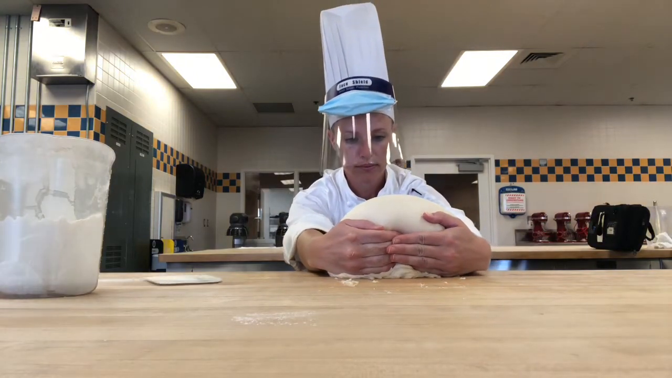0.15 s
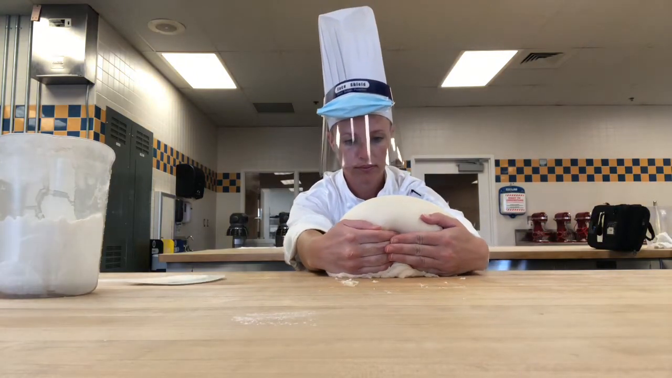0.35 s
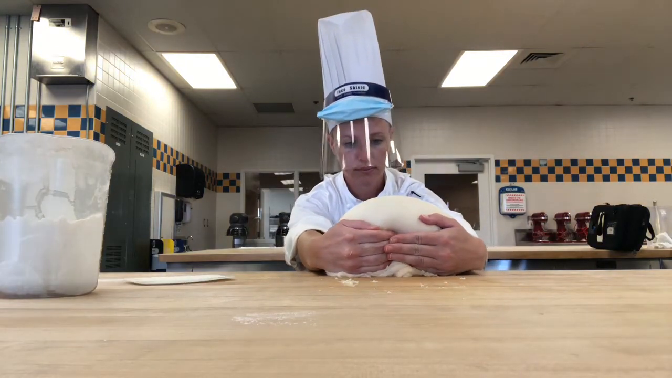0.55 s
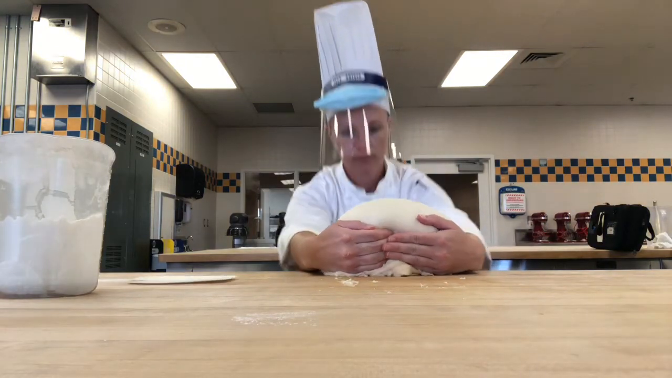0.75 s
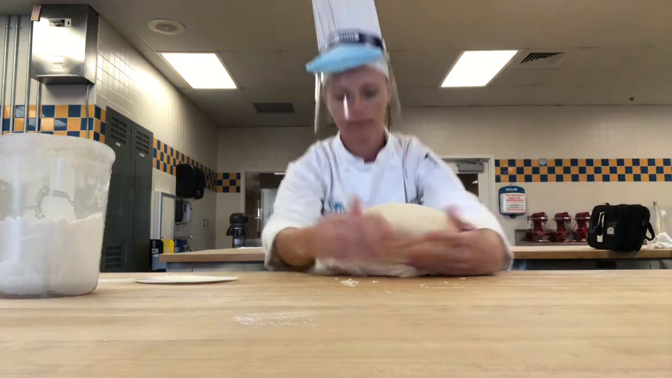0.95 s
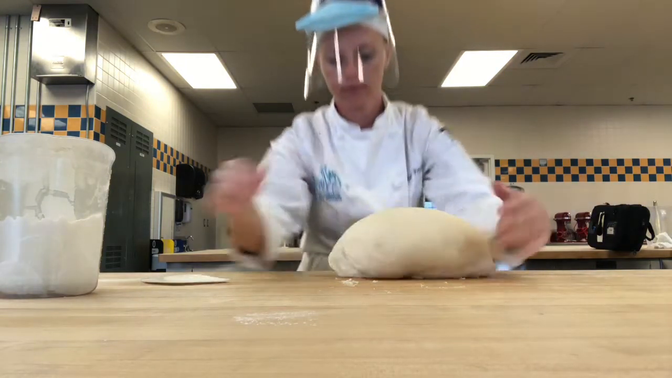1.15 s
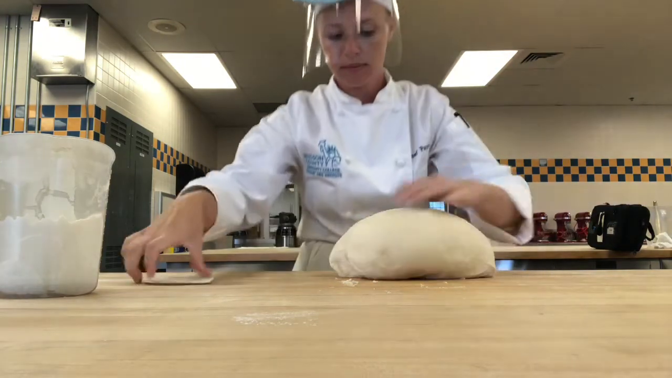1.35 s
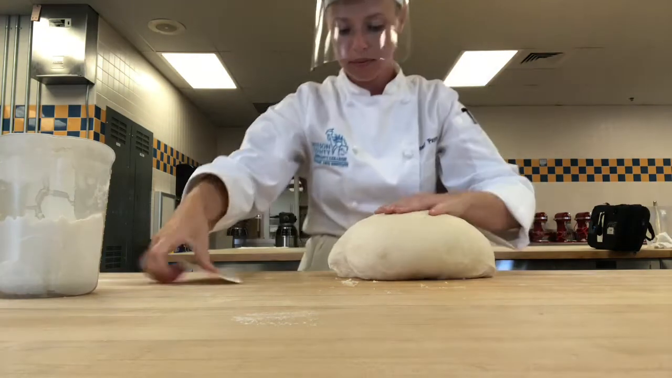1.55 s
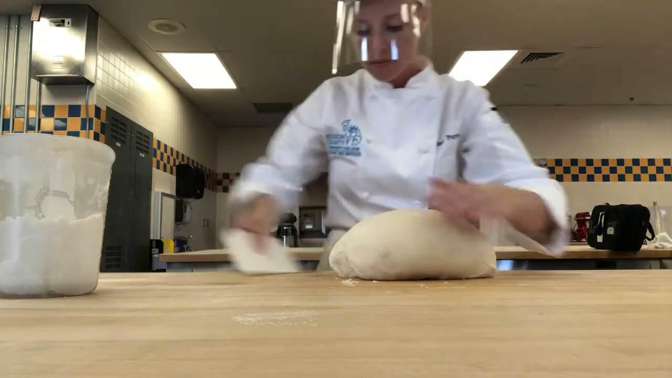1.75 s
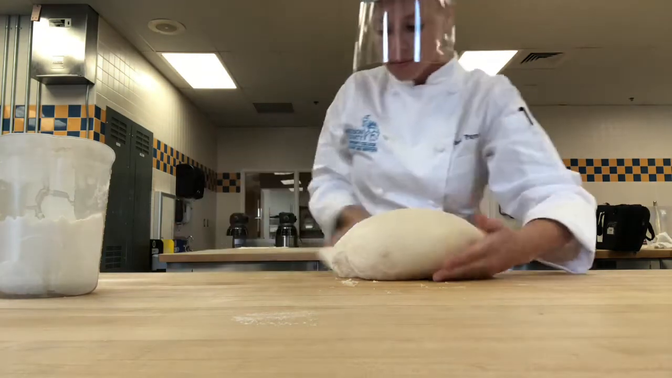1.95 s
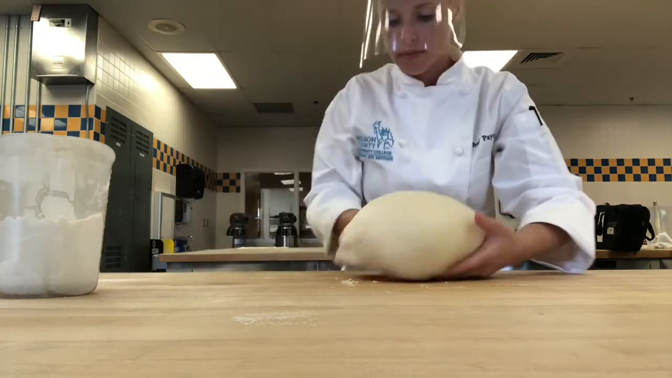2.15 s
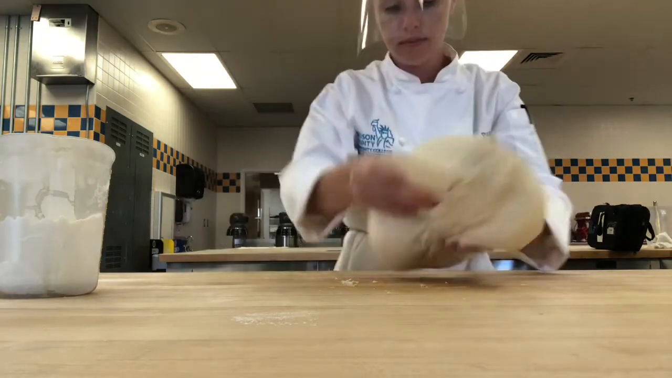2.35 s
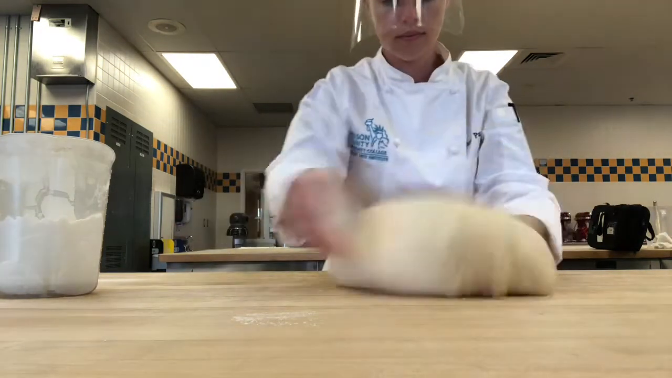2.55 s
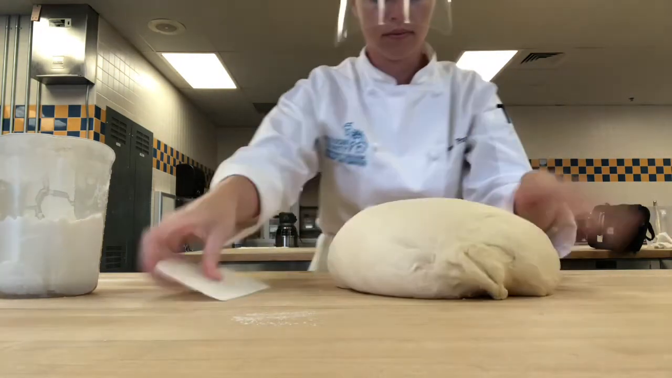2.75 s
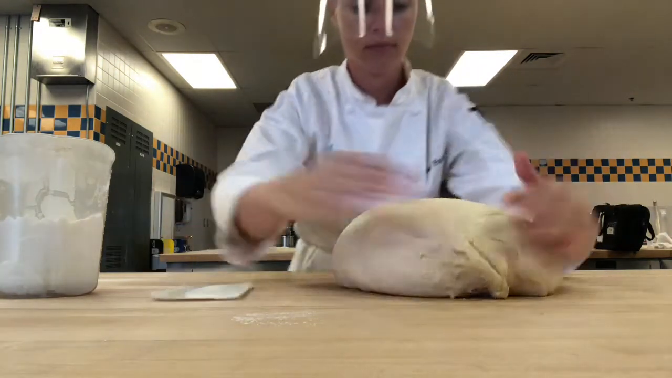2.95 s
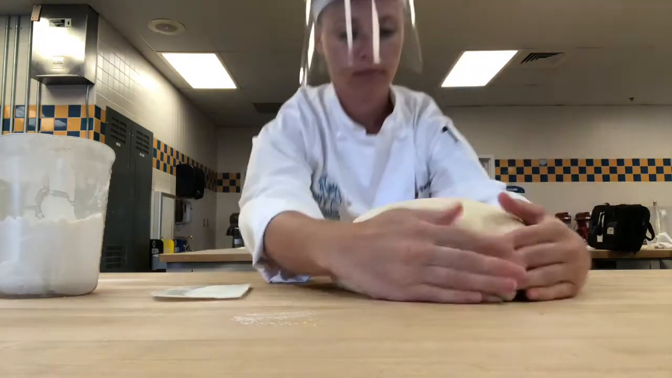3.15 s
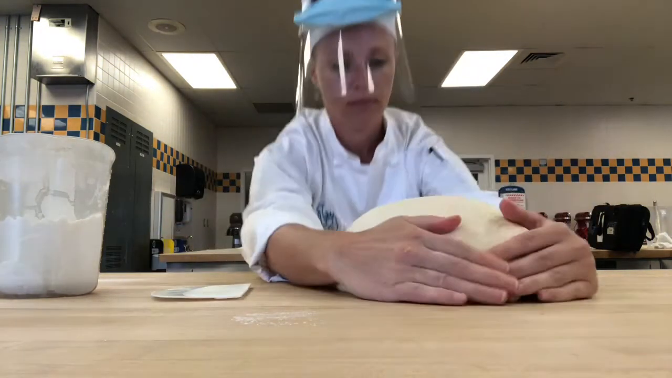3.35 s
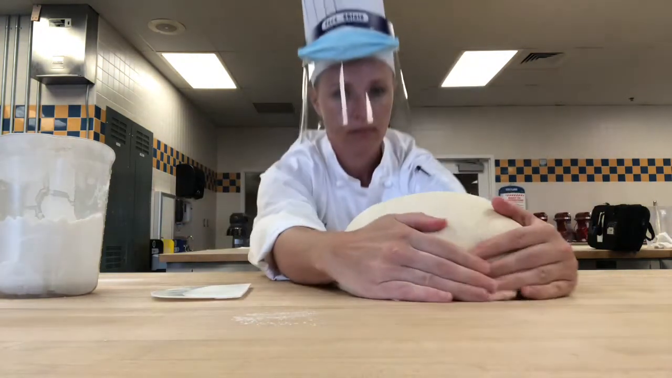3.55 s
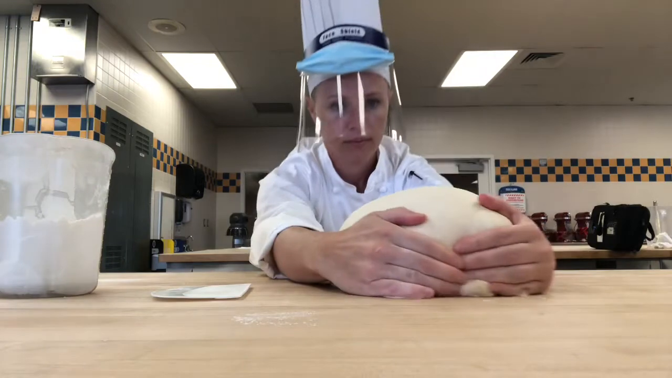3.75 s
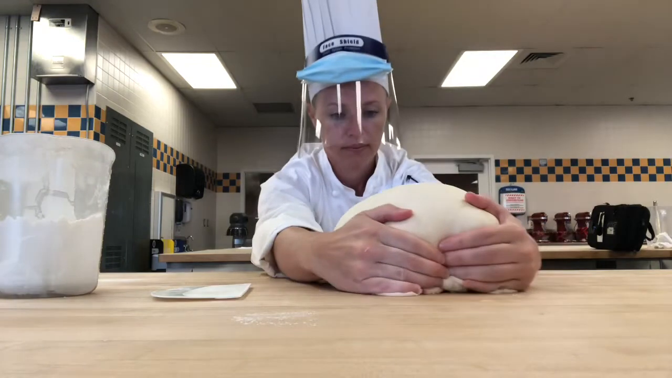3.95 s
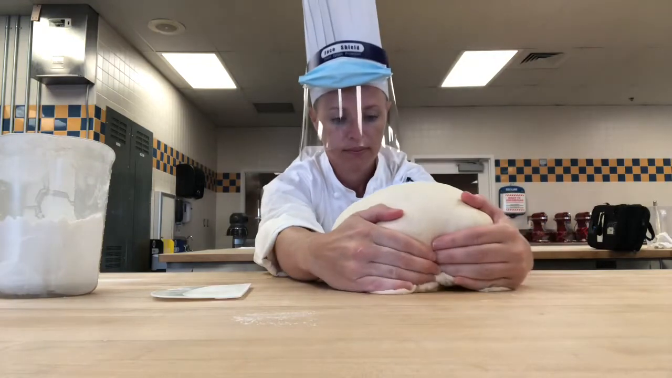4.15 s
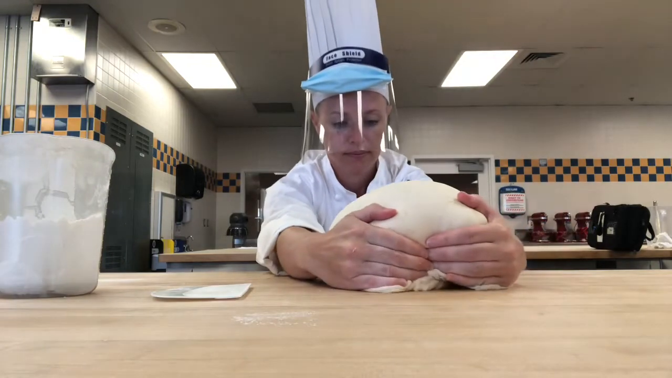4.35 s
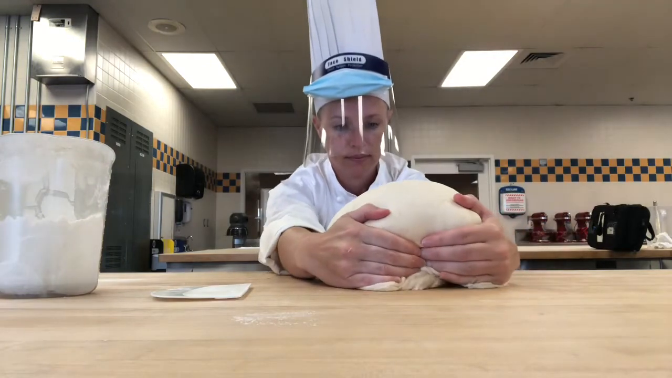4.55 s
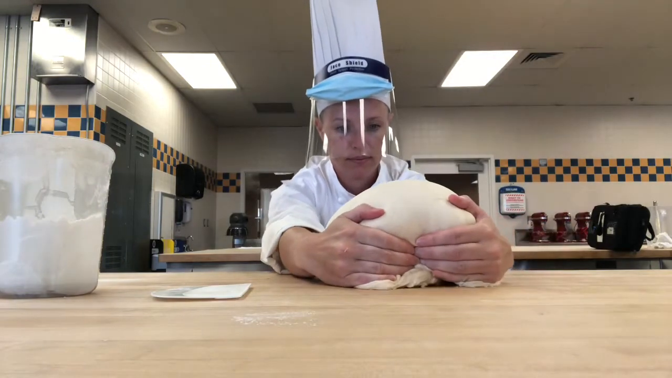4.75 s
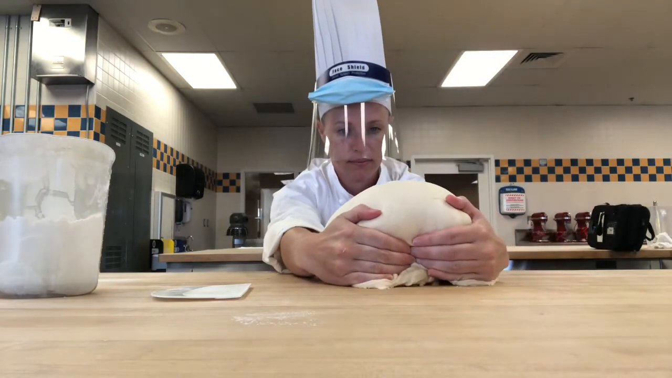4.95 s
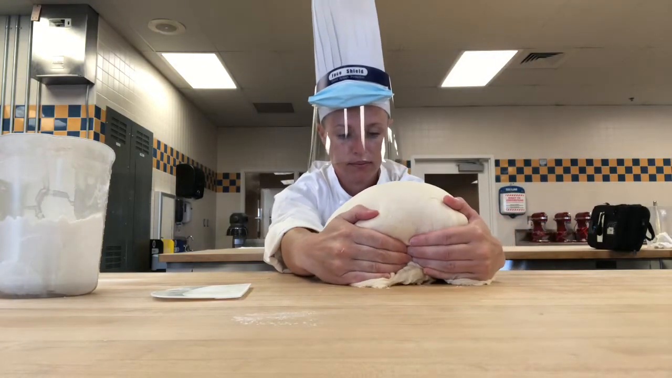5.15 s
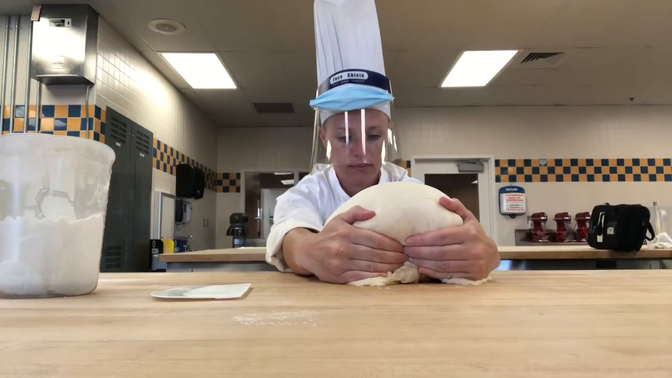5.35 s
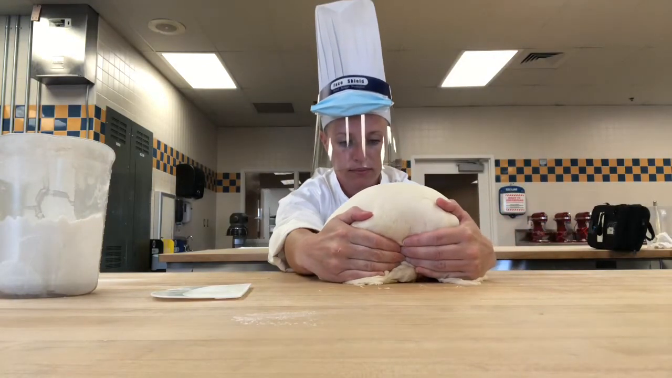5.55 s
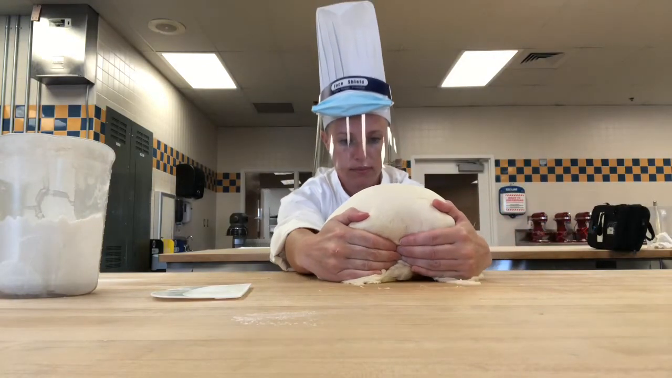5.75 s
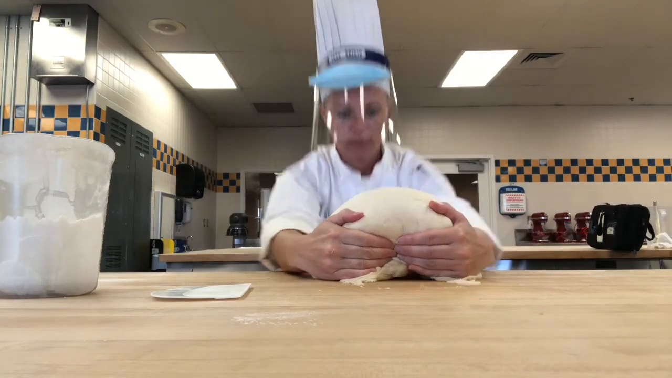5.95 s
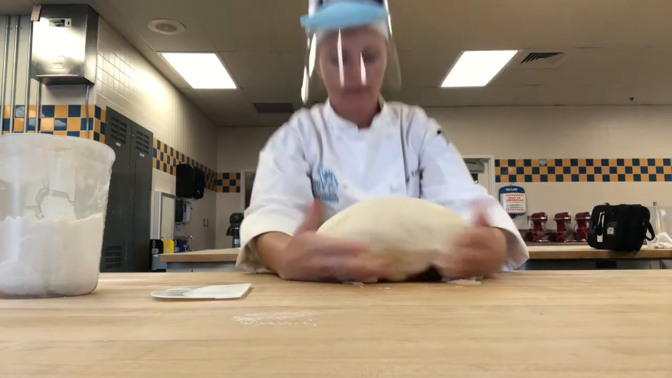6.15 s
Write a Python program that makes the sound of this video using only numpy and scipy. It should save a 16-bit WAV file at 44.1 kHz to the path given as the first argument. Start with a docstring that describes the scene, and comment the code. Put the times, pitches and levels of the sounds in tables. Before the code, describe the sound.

In a humming kitchen, a scraper clacks and rasps under dough, a hard knock follows, and palms brush the dough quietly afterwards.

```python
"""A ball of bread dough is cupped, turned and dragged over a floured bench: coloured flour-grain clicks.
A plastic scraper scrapes under it (stick-slip noise) and knocks on the wood (noise cracks, ringing modes).
Ticks, bumps and brushes are shaped noise; a rising tone squeaks. The bench is close to the microphone.
Around it a large kitchen returns a diffuse echo, over duct noise and motor tones that hum and beat."""
import sys
import numpy as np
from scipy import signal
from scipy.fft import rfft, irfft
from scipy.io import wavfile
from scipy.ndimage import map_coordinates

SR = 44100
rng = np.random.default_rng(int(sys.argv[2]) if len(sys.argv) > 2 else 0)


def transcribe(u):
    """Save the signal u as a 16-bit wav file named by the first command-line argument.

    u: samples, shape (n,) or (channels, n), limited to [-1, 1]; the rate is SR.
    q: integer samples, one column per channel.
    """
    v = np.clip(np.atleast_2d(u).T, -1, 1)
    q = np.round(v * 32767).astype(np.int16)
    wavfile.write(sys.argv[1], SR, q)


N = 272538
TIME = np.arange(N) / SR  # seconds


def from_db(db):
    """Decibels to amplitude gain."""
    return 10 ** (np.asarray(db) / 20)


def rms_one(x):
    """Scale to unit rms."""
    return x / np.sqrt(np.mean(x ** 2) + 1e-20)


def band(x, low_hz, high_hz, order=2):
    """Causal Butterworth band-pass."""
    sos = signal.butter(order, [low_hz, min(high_hz, .45 * SR)], "band", fs=SR, output="sos")
    return signal.sosfilt(sos, x + 1e-18)


def colour(x, points):
    """Minimum-phase filter through (hz, level_db) points, with unit power gain for white noise."""
    hz, level_db = np.transpose(points)
    grid_hz = np.arange(4097) * SR / 8192
    curve_db = np.interp(np.log(grid_hz + 1), np.log(hz), level_db)
    # folding the cepstrum onto positive time makes the filter causal
    cepstrum = irfft(np.log(from_db(curve_db)))
    cepstrum[1:4096] *= 2
    cepstrum[4097:] = 0
    response = irfft(np.exp(rfft(cepstrum)))
    return signal.fftconvolve(x, response / np.linalg.norm(response))[:N]


def drift(rate):
    """Smooth random wander of rms 1 through `rate` random knots per second."""
    knots = rng.standard_normal(4000)
    return rms_one(map_coordinates(knots, [TIME * rate], order=3, mode="wrap"))


def grains(per_s, spread_db):
    """Tiny slips of flour grains: random clicks of uneven size, rms 1."""
    sizes = from_db(spread_db * np.minimum(rng.exponential(1, N), 4))
    present = rng.random(N) < per_s / SR
    return rms_one(sizes * rng.standard_normal(N) * present)


def arch(start_s, length_s, skew):
    """Speed of one movement: from rest up to 1 and back; a skew under 1 peaks early."""
    progress = np.clip((TIME - start_s) / length_s, 0, 1)
    return np.abs(np.sin(np.pi * progress ** skew))


def fading(s, level_db, t60, rise_s):
    """Envelope that swells as the contact closes and then dies away by 60 dB in t60 seconds."""
    age = np.maximum(TIME - s, 0)
    return np.minimum(age / rise_s, 1) * from_db(level_db - 60 * np.minimum(age / t60, 3))


def motor_tone(hz, level_db, phase):
    """A steady motor or mains tone whose phase wanders a little; level_db is its rms."""
    in_step_s, wander_rad = .62, .15  # equal phases meet near this time
    angle = 2 * np.pi * hz * (TIME - in_step_s) + phase + wander_rad * drift(3.03)
    return np.sqrt(2) * from_db(level_db) * np.cos(angle)


def ventilation():
    """Air noise in the ducts and their resonances, under motor tones that beat against each other."""
    # steady motor and mains tones: hz, level_db
    hum = [(28.7, -63.5), (56.48, -59), (57.91, -54), (112.92, -59), (114.9, -46.5), (115.78, -54),
           (120.03, -51), (125.83, -53), (126.68, -53), (135.9, -62), (172.35, -56.5), (197.6, -61.5),
           (240.02, -60.5), (289.5, -62), (315.97, -57), (373.42, -62), (459.6, -59.5), (517.05, -62),
           (545.77, -60.5)]
    # two fans at almost the same speed: hz, level_db
    fan_pair = [(229.8, -47), (231.57, -52.5)]
    # spectral shape of air in the ducts: hz, relative level_db_per_hz
    duct = [(39, -25), (54, -2), (78, -6), (125, 8), (170, 1), (340, 3), (520, 0.5), (620, -2.5),
            (1050, -4), (1450, -5.5), (1850, -15), (3100, -26), (7700, -33), (8300, -37.5), (15000, -47)]
    # resonances of the ducts and grilles: hz, width_hz, level_db
    grilles = [(58.8, 17, -60), (476.3, 75, -50.5), (2260, 560, -66.5), (4220, 560, -78.5)]
    duct_db = -44
    sound = from_db(duct_db) * colour(rng.standard_normal(N), duct)
    for hz, width_hz, level_db in grilles:
        noise = rng.standard_normal(N + SR)
        # one second of run-in lets the resonance settle
        settled = band(noise, hz - width_hz / 2, hz + width_hz / 2)[SR:]
        sound += from_db(level_db) * rms_one(settled)
    for hz, level_db in hum:
        sound += motor_tone(hz, level_db, rng.uniform(0, 2 * np.pi))
    for hz, level_db in fan_pair:
        sound += motor_tone(hz, level_db, 0)
    return sound


def kitchen(x, delay_s=0.0089, t60=1, treble_t60=0.37, mid_db=-3.0, treble_db=4.0):
    """Diffuse echo of the tiled room: decaying noise in three overlapping bands, the treble dying first."""
    age = TIME[:SR]
    low = band(rng.standard_normal(SR), 280, 2600) * from_db(-60 * age / t60)
    mid = band(rng.standard_normal(SR), 1350, 3600) * from_db(mid_db - 60 * age / t60)
    high = band(rng.standard_normal(SR), 1800, 7500, order=1) * from_db(treble_db - 60 * age / treble_t60)
    # silent up to the delay, then fading in over the same time again
    tail = (low + mid + high) * np.clip(age / delay_s - 1, 0, 1)
    return signal.fftconvolve(x, tail / np.linalg.norm(tail))[:N]


def brushes():
    """Quick brushes of skin and plastic: grain noise that swells and fades, each in its own band."""
    # middle_s, width_s (standard deviation), level_db at the middle, low_hz, high_hz
    table = [(.953, 0.0093, -54.5, 3300, 7000), (1.427, 0.0096, -50, 3800, 8600),
             (1.765, 0.013, -55.5, 4500, 12000), (1.765, .02, -48, 550, 2190),
             (2.432, 0.0056, -53, 1500, 7000), (2.478, .008, -45.5, 1600, 3400),
             (2.515, 0.016, -57.5, 4200, 13000), (2.69, 0.028, -52.5, 800, 2800),
             (3.31, .035, -63, 4300, 6500), (3.58, .03, -63, 4200, 7000),
             (4.347, 0.014, -58.5, 6500, 14000), (5.178, 0.009, -57.5, 6800, 15500),
             (5.92, .03, -64, 3500, 7000), (6.158, 0.016, -56, 7500, 15500)]
    sound = np.zeros(N)
    for middle_s, width_s, level_db, low_hz, high_hz in table:
        swell = np.exp(-.5 * ((TIME - middle_s) / width_s) ** 2)
        swish = rms_one(band(grains(per_s=8400, spread_db=2.5), low_hz, high_hz))
        sound += from_db(level_db) * swell * swish
    return sound


def tick(s, level_db, t60, low_hz, high_hz, rise_s=0.00035):
    """One tiny contact: a burst of noise in its own band."""
    noise = rms_one(band(rng.standard_normal(N), low_hz, high_hz, order=3))
    return fading(s, level_db, t60, rise_s) * noise


def ticks(t60=0.0091):
    """Fingertips and sticky dough letting go: short noise bursts, with no ring of the wood."""
    # start_s, level_db, low_hz, high_hz
    table = [(.805, -52, 5000, 11000), (.968, -53, 3500, 11000), (.99, -49, 4000, 12000),
             (1.208, -39, 1200, 3800), (2.055, -47, 1700, 4000), (2.09, -45, 1700, 4000),
             (2.178, -44, 1700, 4000), (2.7782, -42, 1800, 5960), (2.8683, -34.5, 1400, 6350),
             (2.9475, -38, 3970, 8900), (2.9815, -47, 4500, 11000), (3.1122, -44, 3800, 10800),
             (4.945, -59, 5000, 11000), (6.0375, -43, 4000, 10000), (6.043, -48, 4000, 10000),
             (6.082, -44, 1500, 8000), (6.129, -41, 900, 4500)]
    return sum(tick(s, level_db, t60, low_hz, high_hz) for s, level_db, low_hz, high_hz in table)


def bumps(rise_s=.007):
    """Soft bumps and drags of dough, wrists and scraper on the wood: octave-wide noise that dies away."""
    # start_s, level_db, centre_hz, t60_s
    table = [(1.287, -29.5, 310, .1), (1.675, -42.5, 1020, 0.3), (1.75, -44, 160, 0.1),
             (2.472, -32, 135, 0.12), (2.92, -37, 130, 0.16), (3.114, -39, 427, 0.12),
             (6.13, -36, 650, 0.09)]
    sound = np.zeros(N)
    for s, level_db, centre_hz, t60 in table:
        noise = band(rng.standard_normal(N), centre_hz / np.sqrt(2), centre_hz * np.sqrt(2))
        sound += fading(s, level_db, t60, rise_s) * rms_one(noise)
    return sound


def squeak(start_s=5.075, length_s=0.125, level_db=-61, waver=0.004, skew=0.8):
    """A thin whistle as the dough tightens: one swell of a sine that wavers and climbs overall."""
    # time_s, pitch_hz
    pitch = [(5.08, 4200), (5.11, 4360), (5.127, 4470), (5.135, 4360), (5.159, 4480), (5.164, 4610),
             (5.182, 4760), (5.195, 4900)]
    hz = np.interp(TIME, *np.transpose(pitch)) * (1 + waver * drift(200))
    swell = from_db(level_db) * arch(start_s, length_s, skew)
    return swell * np.sqrt(2) * np.sin(2 * np.pi * np.cumsum(hz) / SR)


def crack(s, level_db, t60, bright_hz, rise_s=0.00033, treble_from_hz=6000, treble_t60=0.005):
    """A short burst of contact noise whose treble dies first; duller if the touch is soft."""
    noise = rng.standard_normal(N)
    body = signal.sosfilt(signal.butter(1, treble_from_hz, fs=SR, output="sos"), noise)
    treble = noise - body
    burst = fading(s, level_db, t60, rise_s) * body + fading(s, level_db, treble_t60, rise_s) * treble
    softness = signal.butter(2, min(bright_hz, .45 * SR), fs=SR, output="sos")
    return signal.sosfilt(softness, burst + 1e-18)


def snap(age, bright_hz, uneven_db=0.5, rise_s=0.00042, t60=0.013):
    """The scraper's modes ring for an instant, never quite alike; a soft contact weakens the high ones."""
    # modes of the plastic scraper: hz, relative level_db
    modes = [(2490, -22), (3600, -20.5), (4220, -19.5), (5000, -23), (5570, -23), (6800, -23), (7350, -23),
             (8750, -23), (9450, -25), (10800, -27), (13200, -31)]
    rings = np.zeros(len(age))
    for hz, level_db in modes:
        strength, phase = rng.standard_normal(2)
        gain = from_db(level_db + uneven_db * strength) / np.hypot(1, (hz / bright_hz) ** 2)
        rings += gain * np.sin(2 * np.pi * hz * age + np.pi * phase)
    return rings * np.minimum(age / rise_s, 1) * from_db(-60 * age / t60)


def knocks(width=0.23, thud_db=-12.0, crack_db=-10.5, lag_s=0.0002, crack_t60=0.027):
    """Scraper and fingers hit the bench: crack and plastic snap, then bending waves as note and thud."""
    # start_s, edge_db (drives crack and snap), contact bright_hz, hollow note_db (peak), note_hz
    table = [(1.3274, -28, 4200, -38.5, 2130), (1.7278, -20, 9000, -23, 1300),
             (1.7419, -24, 9000, -30, 1210), (1.7898, -37, 3600, -33, 1370),
             (2.4334, -23.5, 8500, -44, 1420), (2.4716, -25.5, 4200, -33, 2260),
             (2.4760, -33, 3000, -39, 2400), (2.4806, -16.5, 16000, -30, 2550),
             (2.6053, -19.5, 6500, -29.5, 1480), (2.6403, -10.5, 11900, -13.5, 1363),
             (2.6497, -38, 7050, -47, 1320), (2.6716, -26, 4000, -37, 2370), (6.14, -26, 6000, -40, 1080)]
    # spectral shape of the contact crack: hz, relative level_db_per_hz
    crack_colour = [(300, -7.5), (1000, 10), (2200, 2.5), (3200, -3), (4200, -3.5), (6100, -5.5),
                    (7100, -4), (8000, -9), (9200, -8), (11000, -9.5), (15000, -4)]
    cracks, snaps, notes, blows = np.zeros((4, N))
    tap = signal.unit_impulse(SR // 50)
    for s, edge_db, bright_hz, note_db, hz in table:
        cracks += crack(s, edge_db, crack_t60, bright_hz)
        at = round(s * SR)
        snaps[at:at + len(tap)] += from_db(edge_db) * snap(TIME[:len(tap)], bright_hz)
        # the note depends on where the blade lands, and the grip damps it within a few cycles
        note = band(tap, hz * (1 - width / 2), hz * (1 + width / 2), order=3)
        at = round((s + lag_s) * SR)
        notes[at:at + len(tap)] += from_db(note_db) * note / abs(note).max()
        blows[at] += from_db(note_db)
    bench = band(blows, 300, 620)
    # the loudest thud peaks thud_db relative to the strongest blow
    thuds = from_db(thud_db) * blows.max() * bench / abs(bench).max()
    return notes + thuds + snaps + from_db(crack_db) * colour(cracks, crack_colour)


def scratch(depth):
    """Stick-slip noise in a broad resonance of the blade that sinks in pitch as the dough loads it."""
    free_hz, loaded_hz, loading_power, width_octaves = 7000, 2380, 4.2, 0.49
    centre_hz = free_hz * (loaded_hz / free_hz) ** (depth ** loading_power)
    slips = grains(per_s=3000, spread_db=-1.0)
    edges = np.geomspace(1200, 9600, 7)  # Hz
    # crossfading fixed bands moves the resonance
    sound = np.zeros(N)
    for low, high in zip(edges, edges[1:]):
        octaves_away = np.log2(np.sqrt(low * high) / centre_hz)
        nearness = np.exp(-(octaves_away / width_octaves) ** 2)
        sound += nearness * rms_one(band(slips, low, high))
    return sound / np.sqrt(2)


def scrape():
    """The blade edge sticks and slips along the wood, catches on coarser crumbs and sings faintly."""
    # spectral shape of the rasp: hz, relative level_db_per_hz
    scrape_colour = [(500, -3), (1400, 11.5), (2300, 10), (3200, 0), (4800, 6), (7000, 0), (10000, -3.5),
                     (15000, -13)]
    # the blade catches on crumbs: start_s, level_db
    catch_table = [(1.757, -48), (1.773, -46), (1.8336, -38), (1.882, -34), (1.911, -38)]
    start_s, stop_s, attack_s, release_t60 = 1.728, 1.908, 0.022, 0.16
    bite_db, drag_rise_db, drag_power = -50.5, 7.5, 2.6
    grit_db = -6.0  # relative to the rasp
    blade_hz, blade_width_hz, blade_db = 4620, 650, -49
    scratch_db, scratch_growth = -41.5, 1.9

    # one push bites, meets more drag the deeper it goes, then stops
    depth = np.clip((TIME - start_s) / (stop_s - start_s), 0, 1)
    attack = np.clip((TIME - start_s) / attack_s, 0, 1)
    release = from_db(-60 * np.clip((TIME - stop_s) / release_t60, 0, 3))
    drag = from_db(bite_db + drag_rise_db * depth ** drag_power)
    rasp = colour(grains(per_s=12000, spread_db=1.0), scrape_colour)
    # crumbs of each size rattle under the edge on their own
    edges = np.geomspace(1100, 6000, 5)  # Hz
    rattle = np.zeros(N)
    for low, high in zip(edges, edges[1:]):
        rattle += rms_one(band(grains(per_s=300, spread_db=0), low, high))
    grit = from_db(grit_db) * rms_one(rattle)
    # the blade's own resonance sings out near the end of the push
    slips = grains(per_s=3000, spread_db=2.0)
    ring = rms_one(band(slips, blade_hz - blade_width_hz / 2, blade_hz + blade_width_hz / 2, order=1))
    sing = from_db(blade_db) * arch(1.80, 0.093, skew=1.3) * ring
    growing_scratch = from_db(scratch_db) * depth ** scratch_growth * scratch(depth)
    catches = sum(tick(s, level_db, .022, 1200, 4930) for s, level_db in catch_table)
    return catches + attack * release * (drag * (rasp + grit) + sing + growing_scratch)


def sliding(fine_db=4.5, crackle_db=-11.0, judder_db=1.03):
    """Dough and palms roll over flour: coarse grain noise, fine hiss, and tiny snaps of sticky spots."""
    # strokes over the flour: start_s, length_s, friction_db, hiss_db (relative to friction, before fine_db)
    strokes = [(0.794, 0.27, -57.5, -14), (.97, 0.28, -57.5, -19), (1.34, 0.18, -55.5, -10.5),
               (1.477, 0.28, -60.5, -14), (1.85, 0.41, -54, -15), (2.177, 0.12, -61.5, -8),
               (2.402, 0.17, -59.5, -11), (2.618, 0.3, -60, -19), (2.825, 0.34, -56.5, -18.5),
               (3.097, 0.51, -58.5, -15.5), (3.276, 0.75, -60.5, -7), (3.70, 0.98, -74, -8),
               (5.77, 0.62, -57, -14.5), (6.0, 0.29, -54.5, -14)]
    # spectral shape of dough on flour: hz, relative level_db_per_hz
    slide_colour = [(600, -7), (1400, 7.5), (2400, 5), (3200, 0.5), (4700, 2.5), (7000, -2.5), (10000, -12),
                    (15000, -58)]
    stroke_skew, friction_power = 0.85, 0.97
    creep_from_s, creep_rise_s, creep_db, creep_hiss_db = 0.38, .5, -68, -13.5

    # the palms keep creeping over the dough between strokes
    creep = from_db(creep_db) * np.clip((TIME - creep_from_s) / creep_rise_s, 0, 1)
    power = creep ** 2
    hiss_power = (creep * from_db(creep_hiss_db)) ** 2
    for start_s, length_s, friction_db, hiss_db in strokes:
        # friction follows the speed of the stroke
        friction = from_db(friction_db) * arch(start_s, length_s, stroke_skew) ** friction_power
        power += friction ** 2
        hiss_power += (friction * from_db(hiss_db)) ** 2
    judder = from_db(judder_db * drift(40))
    coarse = colour(grains(per_s=11000, spread_db=1.0), slide_colour)
    fine = from_db(fine_db) * rms_one(band(grains(per_s=16000, spread_db=-2.0), 3900, 14500))
    snaps = from_db(crackle_db) * rms_one(band(grains(per_s=320, spread_db=-6.5), 1400, 6000))
    return judder * (np.sqrt(power) * (coarse + snaps) + np.sqrt(hiss_power) * fine)


def scene():
    """Work on the bench close by, the room echo and ventilation around it; one channel."""
    echo_db = -17.5
    bench = sliding() + scrape() + knocks() + ticks() + bumps() + brushes() + squeak()
    return (bench + from_db(echo_db) * kitchen(bench) + ventilation())[None]


def record(dry):
    """The microphone loses the deepest rumble below 24 Hz, and the top is cut above 15.8 kHz."""
    thinned = signal.sosfilt(signal.butter(2, 24, "high", fs=SR, output="sos"), dry)
    return signal.sosfilt(signal.ellip(10, .1, 70, 15800, fs=SR, output="sos"), thinned)


dry = scene()
out = record(dry)
transcribe(out)
```